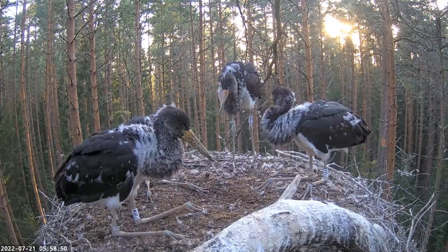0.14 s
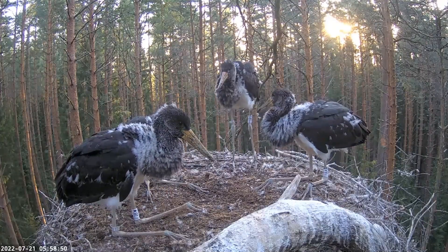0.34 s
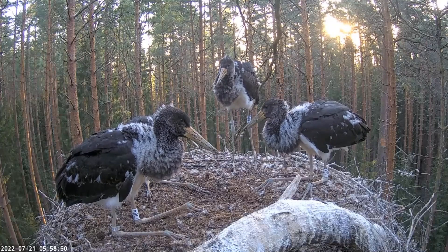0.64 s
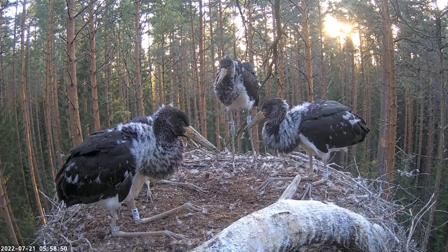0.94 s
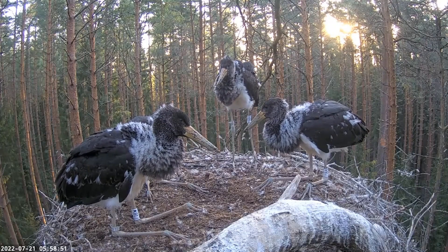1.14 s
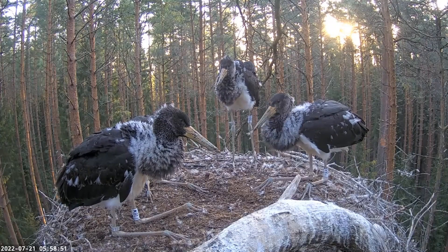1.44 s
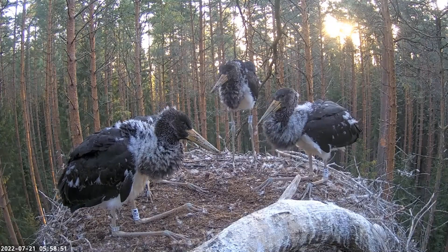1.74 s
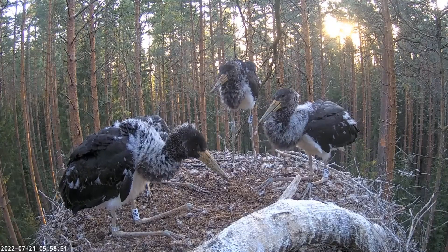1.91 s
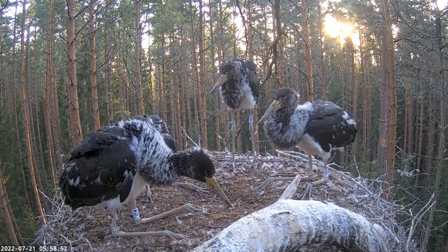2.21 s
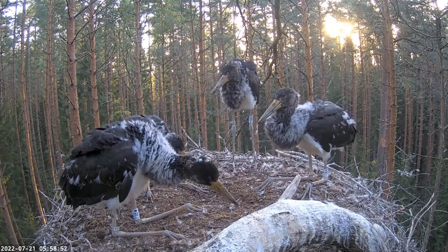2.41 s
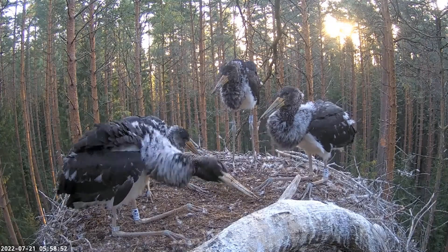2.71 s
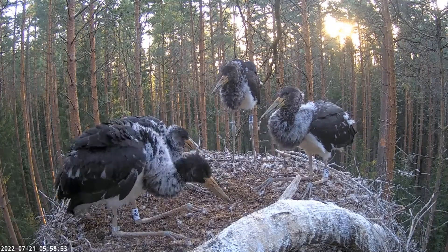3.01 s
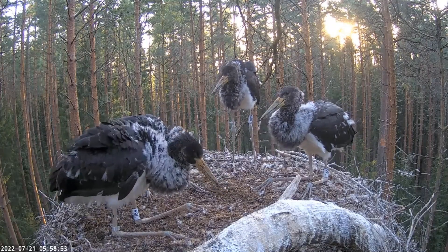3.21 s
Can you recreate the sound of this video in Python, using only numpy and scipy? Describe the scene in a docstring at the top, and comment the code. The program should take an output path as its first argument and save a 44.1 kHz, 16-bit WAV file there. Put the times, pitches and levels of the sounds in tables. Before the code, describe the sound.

Stork chicks beg on a forest nest in a fast run of hoarse, overlapping whistles mixed with faint croaks and clicks. They ease off briefly, then resume, heard through a thin-sounding outdoor microphone with faint hiss.

```python
"""Stork chicks begging on a forest nest.

Several whistling voices overlap at about nine notes a second: fluttering tones in a hoarse rasp,
over a crowd of fainter chirps. Pulses ring the throat as low croaks and clicks. Nest and trunks
scatter the sound. A narrow-band outdoor microphone hears it, with slight overload and hiss."""
import sys
import numpy as np
from scipy import signal
from scipy.fft import rfft, irfft
from scipy.io import wavfile
from scipy.ndimage import uniform_filter1d

SR = 44100
rng = np.random.default_rng(int(sys.argv[2]) if len(sys.argv) > 2 else 0)


def inscribe(sig):
    """Save sig as 16-bit PCM at rate SR to the path in sys.argv[1].

    A 1-D sig is mono; a 2-D sig holds one channel per row.
    Samples are clipped to [-1, 1] before scaling.
    """
    pcm = np.round(np.clip(np.atleast_2d(sig).T, -1, 1) * 32767)
    wavfile.write(sys.argv[1], SR, pcm.astype(np.int16))


N = 147735

# (start [s], second turn after start [s], length [s], held pitch [Hz], last dip [Hz], level [dB],
# end accent [dB])
WARBLES = [(-.044, 0.038, 0.071, 3140, 2890, -46, 5.5), (0.082, 0.042, 0.066, 3210, 2845, -43, 5.5),
           (0.196, 0.037, .056, 3250, 2757, -40, 1.5), (0.299, 0.034, 0.051, 3250, 2920, -37, 7),
           (0.415, 0.041, 0.055, 3200, 2566, -38.5, 8), (.535, 0.041, 0.12, 3200, 2730, -39.5, -7),
           (0.654, 0.038, 0.052, 3180, 2670, -43.5, -2), (0.764, 0.049, 0.064, 3155, 2640, -40.5, 4.5),
           (0.884, .042, 0.042, 2900, 2500, -43.5, -6), (1.725, 0.024, 0.045, 3930, 2900, -36.5, 1.5),
           (1.827, 0.055, 0.073, 3426, 3190, -36.5, 4.5), (1.940, 0.044, 0.077, 3408, 2955, -37, 1.5),
           (2.063, 0.043, 0.062, 3266, 3024, -34.5, 3.5), (2.189, 0.042, 0.063, 3300, 2726, -37, 5),
           (2.299, 0.045, .074, 3363, 3060, -37, 1.5), (2.425, .055, 0.0783, 3287, 2407, -38.5, 3),
           (2.547, 0.054, 0.073, 3407, 3126, -37.5, 7.5), (2.669, 0.043, 0.062, 3247, 2906, -37, 7),
           (2.776, 0.052, 0.072, 3245, 3150, -38, 11), (2.886, 0.056, 0.076, 3207, 3180, -37, 7.5),
           (2.999, 0.047, 0.072, 3220, 2833, -37.5, 7), (3.104, 0.051, 0.095, 3134, 2407, -38.5, 3.5),
           (3.198, .120, 0.052, 3087, 2800, -40, 0)]
# (time from start [s], pitch [Hz] or 0 for the held pitch, level [dB])
WARBLE_OPENING = [(0, 4506, -7.5), (.004, 3290, 6.5), (.007, 4239, -8.5), (.010, 4255, 1), (.018, 0, -1),
                  (0.022, 0, 0.5)]
# (time from second turn [s], level [dB])
WARBLE_CLOSE = [(-.010, 0.5), (-.003, -6.5), (.002, 1.5), (.010, -1), (.017, 0), (0.051, 3.5)]
# (centre [s], time before [s], time after [s], centre pitch [Hz], depth [Hz], level [dB])
ARCHES = [(.175, .022, .022, 4800, 1200, -55), (.378, .02, .03, 4400, 400, -41),
          (.612, .02, .022, 4350, 400, -43), (.783, .012, .012, 3950, 400, -41),
          (1.395, .008, .008, 3700, -700, -46), (1.937, .037, .02, 4100, 1900, -40),
          (2.053, .038, .012, 4200, 1700, -40), (2.170, .045, .025, 4000, 1600, -40),
          (2.285, .036, .025, 4200, 1800, -42), (2.398, .030, .028, 3700, 1400, -42),
          (1.790, .014, .012, 3300, -200, -41), (1.145, .012, .012, 3800, 200, -58),
          (1.13, .04, .04, 1600, -150, -61)]
# flat-topped whistles (rise at [s], top length [s], top [Hz], foot [Hz], level [dB])
FLATS = [(0.248, 0.044, 4050, 3100, -38), (0.354, 0.049, 4050, 2757, -32.5),
         (0.473, 0.049, 3917, 2737, -31.5), (0.584, 0.051, 3973, 2676, -32),
         (0.696, .048, 3940, 2703, -31.5), (0.816, 0.043, 3862, 2736, -29),
         (.916, 0.035, 3944, 2750, -29.5), (1.026, 0.032, 3834, 2547, -33.5)]
# (start [s], length [s], low [Hz], bounce [Hz], top [Hz], level [dB])
DIPS = [(1.436, 0.054, 2000, 2890, 4600, -39.5), (1.528, 0.065, 2111, 3155, 4600, -39.5),
        (1.627, 0.073, 2080, 3200, 4600, -38.5), (1.743, 0.063, 2300, 2435, 4700, -41),
        (1.848, 0.073, 2250, 2400, 3000, -44.5), (2.505, 0.058, 2078, 2926, 4400, -38.5),
        (2.587, 0.081, 2520, 2930, 4700, -38), (2.699, 0.08, 2268, 2597, 4600, -39),
        (2.81, .075, 2370, 2626, 4700, -39.5), (2.925, 0.082, 2297, 2614, 4700, -39),
        (3.071, 0.048, 2300, 2673, 3000, -36.5), (0.976, 0.049, 2400, 3064, 2600, -40.5)]
# (share of length [1], level [dB])
DIP_ENVELOPE = [(0, -13), (0.122, 0.5), (0.222, -0.5), (.3, -6), (.42, -6.5), (0.549, -4.5), (0.651, -1.5),
                (0.781, -1.5), (.88, 2), (1, -12)]
# parts of a voice, by note kind (warble [dB], flat [dB], arch [dB], dip [dB])
RASP_DB = [-11.5, -24.5, -25, -9.5]
UNDERTONE_DB = [-26, -50, -40, -24]
OCTAVE_DB = [-31.5, -11.5, -28, -8]
BREATH_DB = [-6, -15, -27.5, -13.5]
# (time [s], level [dB])
CROWD_ENVELOPE = [(0, -27), (0.033, -62.5), (.06, -99), (.18, -48.5), (.22, -53.5), (0.452, -43.5),
                  (.68, -40.5), (0.899, -43), (1.069, -45), (1.11, -62), (1.18, -62.5), (1.24, -86),
                  (1.422, -71), (1.7, -55.5), (1.851, -39.5), (2.2, -44.5), (2.4, -57), (2.552, -48.5),
                  (3.1, -42), (3.16, -65), (3.301, -59), (3.35, -69)]
# pulse runs (start [s], length [s], first rate [Hz], last rate [Hz], level [dB])
CROAKS = [(0, 0.038, 589.5, 484.6, -47.5), (0.045, 0.047, 300, 130, -55), (.125, 0.013, 300, 164.1, -44.5),
          (0.91, 0.018, 611, 476, -50), (1.037, 0.026, 593, 460, -50), (1.051, 0.064, 323.5, 150, -52.5),
          (1.181, 0.023, 300.3, 225, -54), (1.654, 0.012, 395, 294, -49), (2.107, 0.036, 601, 492, -53),
          (2.139, .03, 302.8, 149, -50.5), (2.427, .018, 288.6, 136.8, -50.5), (2.533, .03, 357, 247, -50),
          (2.846, 0.015, 656, 595, -58.5), (3.070, 0.014, 638, 585, -53),
          (3.145, 0.028, 322.7, 161.5, -55.5), (3.218, 0.025, 613, 620, -72), (3.239, 0.029, 423, 307, -43)]
# single pulses (time [s], level [dB])
CLICKS = [(0.089, -44), (0.2, -42), (0.253, -40), (0.302, -33.5), (0.308, -42), (0.386, -49.5),
          (0.42, -41.5), (0.496, -47), (0.534, -41.5), (0.646, -42.5), (0.773, -40.5), (1.113, -39),
          (1.209, -36), (1.227, -35.5), (1.374, -40), (1.447, -45.5), (1.64, -46), (1.729, -41),
          (1.8, -33.5), (1.806, -31), (1.828, -40.5), (1.941, -42.5), (2.062, -43), (2.162, -37),
          (2.177, -36.5), (2.189, -44), (2.302, -45), (2.49, -48), (2.514, -43.5), (2.573, -37),
          (2.598, -35.5), (2.613, -33.5), (2.629, -43), (2.646, -38), (2.668, -43), (2.712, -48),
          (2.776, -45), (3.105, -65), (3.198, -63), (3.273, -30), (3.276, -31), (3.285, -31.5),
          (3.286, -34), (3.3, -28), (3.308, -28)]
# (frequency [Hz], gain [dB], T60 [s])
THROAT_MODES = [(180, -13, 0.023), (836.5, -1.5, 0.013), (1130, -1, 0.0054), (1940, -13, 0.0033),
                (2320, 0.5, 0.0045), (2780, 0, 0.0076), (3430, -7.5, 0.003)]
# spectra (frequency [Hz], gain [dB])
BREATH_SPECTRUM = [(20, -49.5), (600, -17), (1500, -21.5), (2500, -6.5), (3500, 4), (4600, -10), (6000, -1),
                   (22000, -24)]
MIC_RESPONSE = [(20, -17), (1500, 1.5), (2500, -1.5), (4200, 0), (4800, -13.5), (5500, -19), (6500, -43),
                (9000, -45), (13000, -52), (22000, -65.5)]
OVERLOAD_SPECTRUM = [(20, -46), (300, -15), (1000, -11.5), (2500, -10.5), (5500, -4), (6800, -9),
                     (8200, 4.5), (11500, -8.5), (13500, 2.5), (16000, -20)]
FIZZ_SPECTRUM = [(20, -24.5), (1000, -17.5), (5000, 1.5), (6800, -10), (8500, -2.5), (12000, -9.5),
                 (14000, -32), (16000, -31.5)]
HISS_SPECTRUM = [(15, -7.5), (30, -2), (100, -2), (300, -13), (1000, -8), (3000, -18.5), (5500, -11.5),
                 (7000, -19.5), (11000, -18.5), (16000, -22)]


def amp(db):
    return 10 ** (np.asarray(db, float) / 20)


def unit_rms(x):
    return x / np.sqrt(np.mean(x ** 2) + 1e-20)


def colour(x, spectrum):
    """Filter by a spectrum table."""
    hz, db = np.transpose(spectrum)
    bins_hz = np.fft.rfftfreq(len(x), 1 / SR)
    return irfft(rfft(x) * amp(np.interp(np.log(bins_hz + 1), np.log(hz + 1), db)), len(x))


def noise(spectrum):
    return unit_rms(colour(rng.standard_normal(N), spectrum))


def drift(cutoff_hz):
    """Low-passed noise, unit RMS."""
    return unit_rms(signal.lfilter(*signal.butter(2, cutoff_hz, fs=SR), rng.standard_normal(N)))


def chirps(low_hz, high_hz, each_per_s):
    """Hoarse texture: 14 gliding 9 ms chirps, each repeated at random times and levels."""
    out, t = np.zeros(N), np.arange(400) / SR
    for hz, glide_hz_per_s in rng.uniform([low_hz, -109000], [high_hz, 109000], (14, 2)):
        pitch_hz = hz + glide_hz_per_s * (t - t.mean())
        chirp = np.hanning(len(t)) * np.sin(2 * np.pi * np.cumsum(pitch_hz) / SR)
        hits = rng.random(N) < each_per_s / SR
        accent = amp(3.4 * np.minimum(rng.exponential(1, N), 4))
        out += signal.oaconvolve(hits * accent, chirp, "same")
    return unit_rms(out)


def voice(notes, rasp_db, undertone_db, octave_db, breath_db):
    """One chick: a fluttering whistle with octave, patchy undertone, rasp and breath."""
    t, out = np.arange(N) / SR, np.zeros(N)
    wobble = 1 + 0.012 * drift(580) + 0.01555 * drift(70)
    flutter = amp(3 * np.minimum(drift(278), 1.2))
    rasp = amp(rasp_db) * chirps(2089, 4916, each_per_s=45)
    undertone_gain = amp(undertone_db + np.clip(4 * drift(42), -12, 5))
    breath = amp(breath_db) * noise(BREATH_SPECTRUM) * amp(2.2 * drift(130))
    for times_s, hz, db, end_s in notes:
        on = slice(max(round(times_s[0] * SR), 0), round(end_s * SR))
        gate = np.clip(np.minimum((t[on] - times_s[0]) / 0.0021, (end_s - t[on]) / 0.0012), 0, 1)
        envelope = gate * amp(np.interp(t[on], times_s, db))
        pitch_hz = uniform_filter1d(np.interp(t[on], times_s, hz), size=60, mode="nearest")
        phase = 2 * np.pi * np.cumsum(pitch_hz * wobble[on]) / SR
        tone = np.sin(phase) + amp(octave_db) * np.sin(2 * phase)
        tone += undertone_gain[on] * np.sin(0.44 * phase)
        out[on] += envelope * (np.sqrt(2) * tone * flutter[on] + rasp[on] + breath[on])
    return out


def warble(start_s, turn_s, length_s, held_hz, dip_hz, db, accent_db):
    """Note contour: quick drop, hook, hold, then a second zigzag to a high, sagging end."""
    peak_hz, end_hz, sag_hz = 4300, 4097, 304
    open_s, open_hz, open_db = np.transpose(WARBLE_OPENING)
    close_s, close_db = np.transpose(WARBLE_CLOSE)
    times_s = start_s + np.maximum.accumulate(np.r_[open_s, turn_s + close_s])
    close_hz = [held_hz, peak_hz, peak_hz, dip_hz, end_hz, end_hz - sag_hz]
    hz = np.r_[np.where(open_hz == 0, held_hz, open_hz), close_hz]
    shape_db = np.r_[open_db, close_db[:-2], close_db[-2:] + accent_db]
    return times_s, hz, db + shape_db, start_s + length_s


def crowd():
    """Fainter chirps of other chicks, plus grainy treble recording fizz that follows their level."""
    others = chirps(2300, 4966, each_per_s=40)
    treble_fizz = amp(11) * chirps(7190, 12790, each_per_s=11)
    return (others + treble_fizz) * amp(np.interp(np.arange(N) / SR, *np.transpose(CROWD_ENVELOPE)))


def throat():
    """Pulses ring the throat: runs croak or squeak, more unevenly when slow; single ones click."""
    pulse_db, fundamental_db = 8.5, -5.5
    pulses, fundamental, t = np.zeros(N), np.zeros(N), np.arange(1500) / SR
    ring = sum(amp(db - 60 * t / t60_s) * np.sin(2 * np.pi * hz * t) for hz, db, t60_s in THROAT_MODES)
    ring *= np.minimum(t / 0.00055 + 0.2, 1)
    shimmer, jitter = amp(3 * rng.standard_normal(N)), 0.05 * drift(200)
    for start_s, length_s, first_hz, last_hz, db in CROAKS:
        on = np.arange(round(start_s * SR), round((start_s + length_s) * SR))
        unevenness = (300 / first_hz) ** 2
        rate_hz = np.geomspace(first_hz, last_hz, len(on)) * (1 + jitter[on] * unevenness)
        cycles = np.cumsum(rate_hz) / SR
        train = np.diff(np.ceil(cycles), prepend=0)
        pulses[on] += amp(db + pulse_db) * train * shimmer[on] ** unevenness
        swell = np.sqrt(np.hanning(len(on)))
        fundamental[on] += amp(db + fundamental_db) * swell * np.sin(2 * np.pi * cycles)
    for time_s, db in CLICKS:
        pulses[round(time_s * SR)] += amp(db)
    return signal.oaconvolve(pulses, ring - ring.mean())[:N] + fundamental


def arch(centre_s, before_s, after_s, centre_hz, depth_hz, db):
    """Note contour: a parabola, louder at its edges; negative depth makes a trough."""
    steps = np.arange(-8, 9) / 8
    offsets_s = steps * np.where(steps < 0, before_s, after_s)
    bend = (offsets_s / max(before_s, after_s)) ** 2
    return centre_s + offsets_s, centre_hz - depth_hz * bend, db + 4 * bend, centre_s + after_s


def flat(rise_at_s, top_s, top_hz, foot_hz, db):
    """Note contour: low lead-in, jump to a sagging plateau, slide back to the foot."""
    lead_s, rise_s, fall_s, foot_s = 0.016, 0.00422, 0.00792, 0.0075
    lead_drop, sag = 0.0954, 0.0436
    times_s = rise_at_s + np.cumsum([-lead_s, lead_s - rise_s / 2, rise_s, top_s, fall_s, foot_s])
    hz = [foot_hz * (1 - lead_drop), foot_hz, top_hz, top_hz * (1 - sag), foot_hz, foot_hz]
    return times_s, hz, db + np.array([-8, 0, 1, -5, 2, -10]), times_s[-1]


def dip(start_s, length_s, low_hz, bounce_hz, top_hz, db):
    """Note contour: falls, bounces, climbs out again."""
    share, shape_db = np.transpose(DIP_ENVELOPE)
    hz = [top_hz * 0.95, top_hz * 0.85, low_hz, low_hz * 1.04, bounce_hz, bounce_hz,
          low_hz, (low_hz + top_hz) / 2, top_hz, top_hz * 0.93]
    return start_s + length_s * share, hz, db + shape_db, start_s + length_s


def forest_scatter(x, t60_s=0.07):
    """Short, sparse echoes from nest and trunks."""
    t = np.arange(SR // 4) / SR
    taps = rng.choice([-1., 1.], len(t)) * (rng.random(len(t)) < 0.05)
    taps *= amp(-60 * t / t60_s) * (t > 0.002)
    return signal.oaconvolve(x, taps / np.linalg.norm(taps))[:N]


def scene():
    """Four voices, one per note kind, plus crowd, throat sounds and scatter."""
    kinds = [(warble, WARBLES), (flat, FLATS), (arch, ARCHES), (dip, DIPS)]
    chicks = np.zeros(N)
    for (contour, rows), *parts_db in zip(kinds, RASP_DB, UNDERTONE_DB, OCTAVE_DB, BREATH_DB):
        chicks += voice([contour(*row) for row in rows], *parts_db)
    chicks += crowd() + throat()
    return (chicks + amp(-13) * forest_scatter(chicks))[None]


def record(dry):
    """Narrow-band microphone: slight overload, fizz that follows the level, steady hiss, band limit."""
    heard = colour(dry[0], MIC_RESPONSE)
    overload = colour(amp(-18) * heard ** 2 + amp(10) * heard ** 3, OVERLOAD_SPECTRUM)
    running_rms = np.sqrt(abs(uniform_filter1d(heard ** 2, size=300)))
    fizz = amp(-36) * running_rms * noise(FIZZ_SPECTRUM)
    hiss = amp(-72.5) * noise(HISS_SPECTRUM)
    lowpass = signal.firwin(511, cutoff=15750, window=("kaiser", 9), fs=SR)
    return signal.oaconvolve(heard + overload + fizz + hiss, lowpass, "same")[None]


dry = scene()
out = record(dry)
inscribe(out)
```